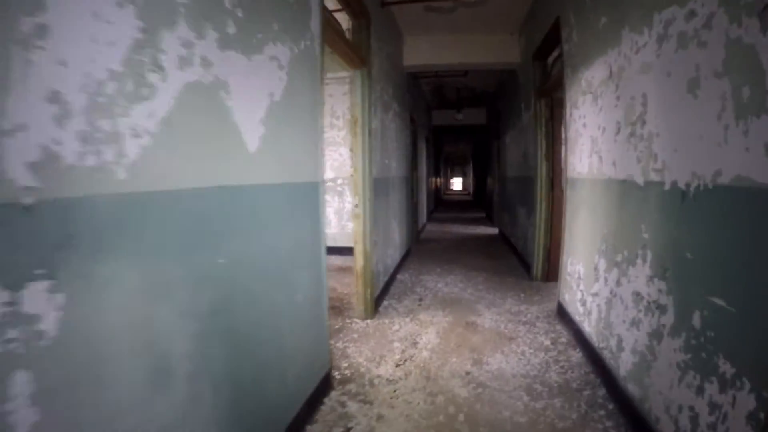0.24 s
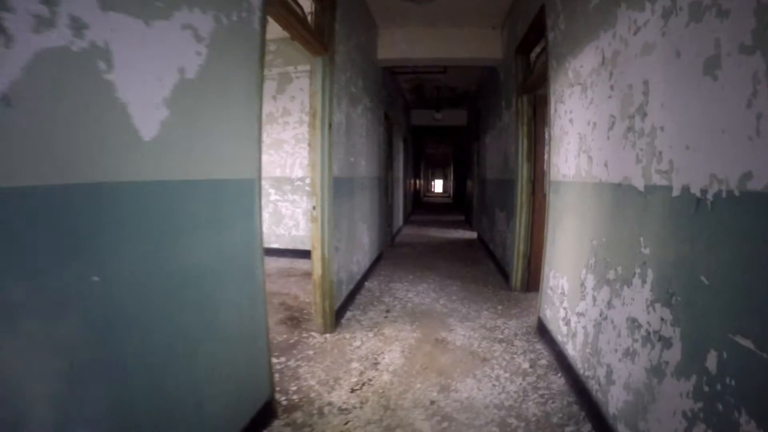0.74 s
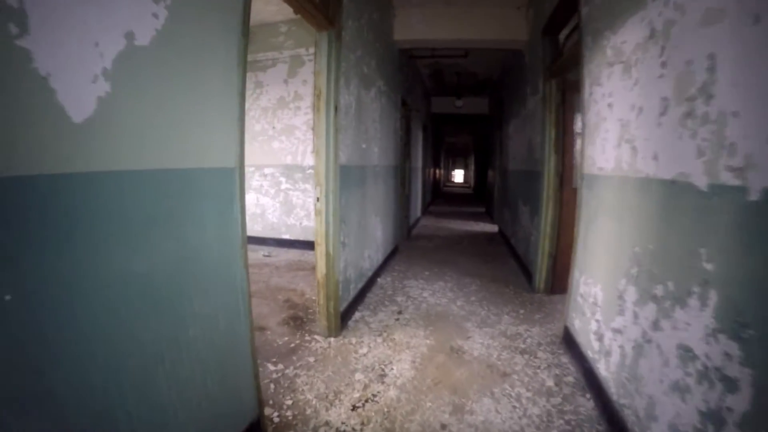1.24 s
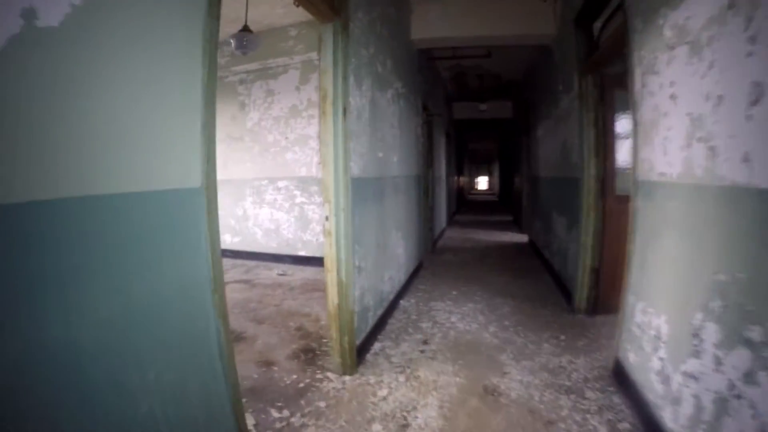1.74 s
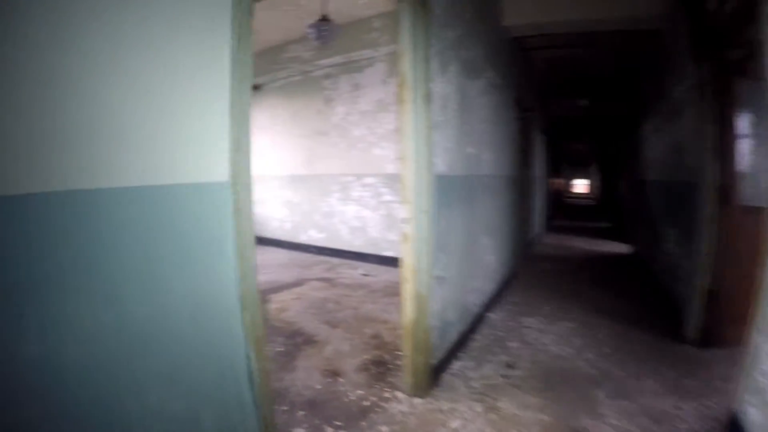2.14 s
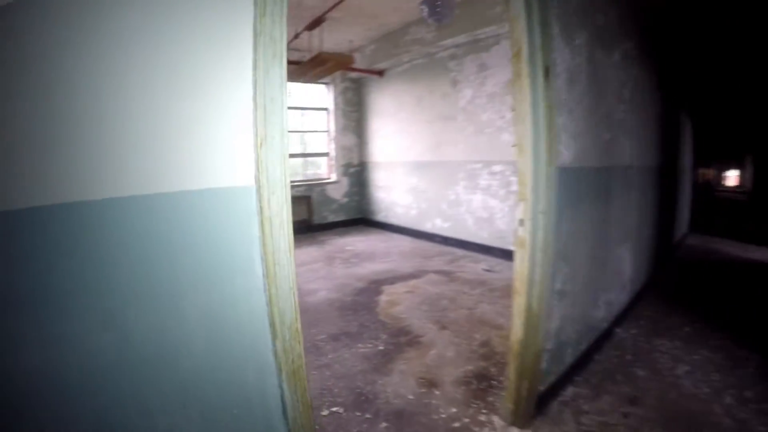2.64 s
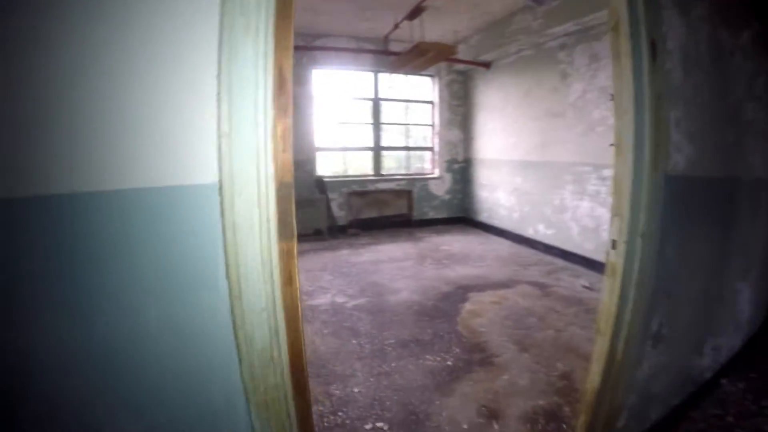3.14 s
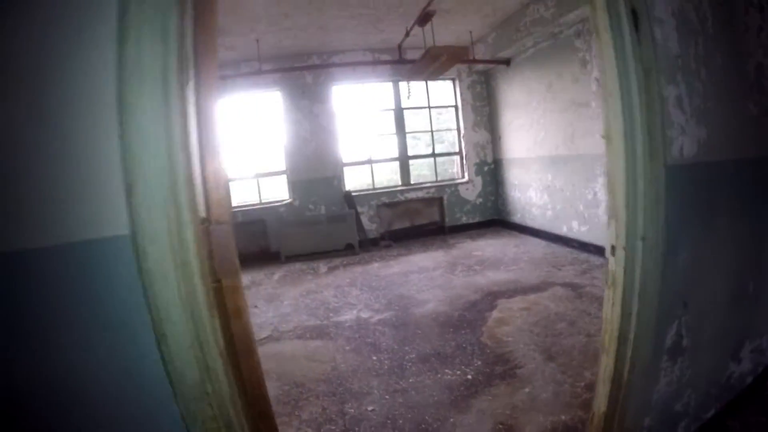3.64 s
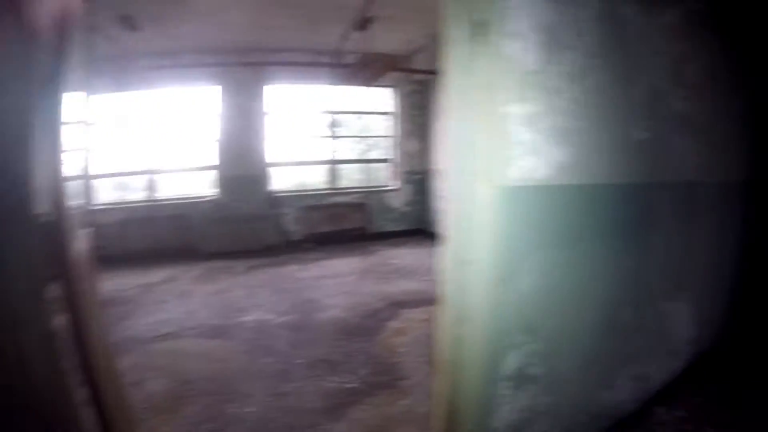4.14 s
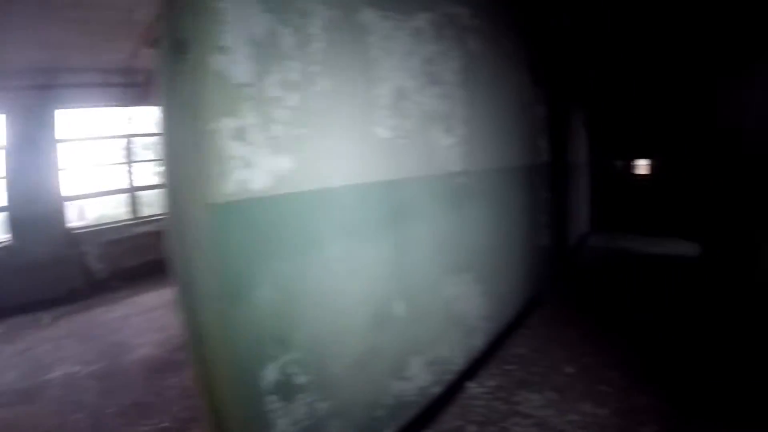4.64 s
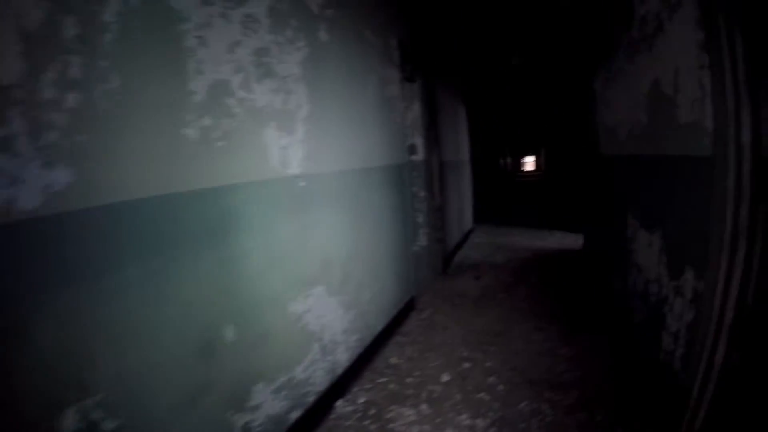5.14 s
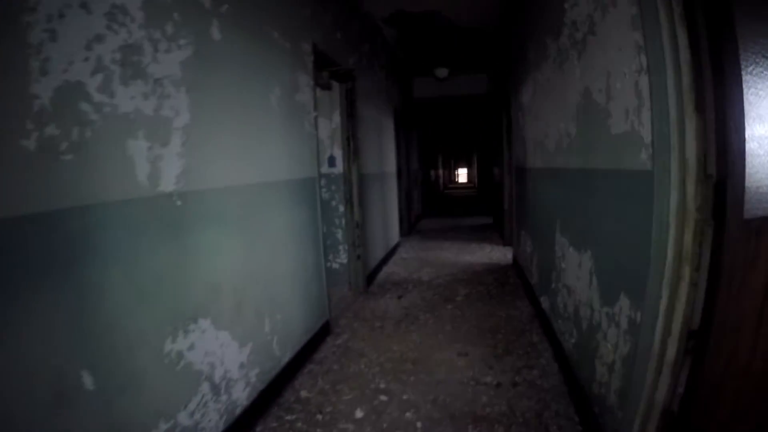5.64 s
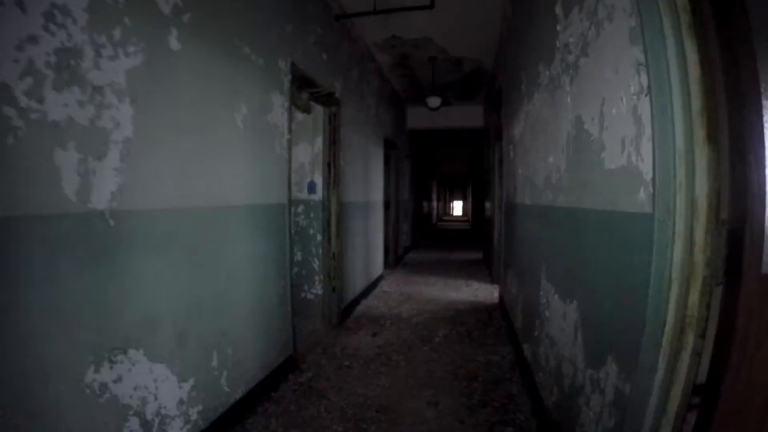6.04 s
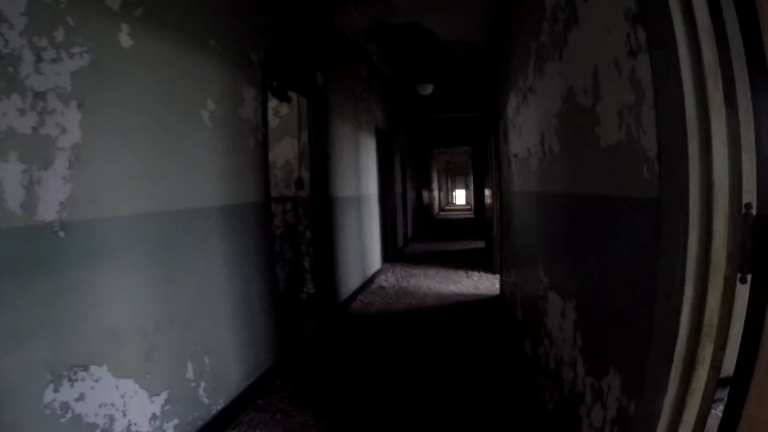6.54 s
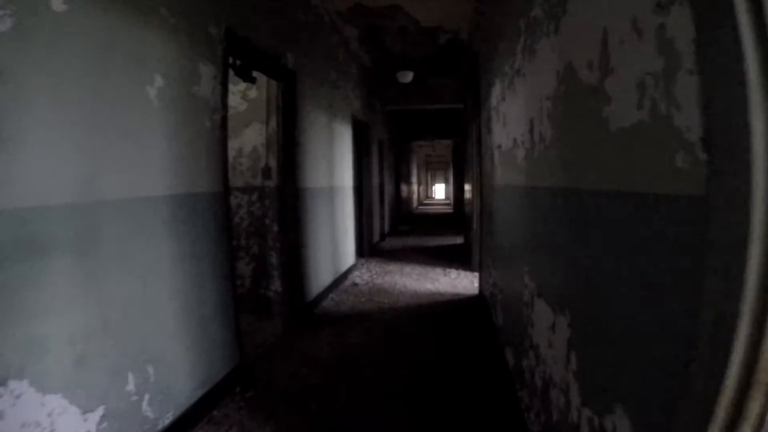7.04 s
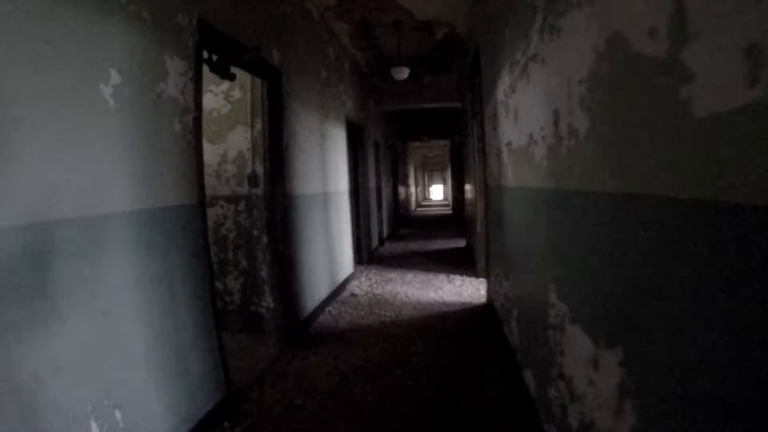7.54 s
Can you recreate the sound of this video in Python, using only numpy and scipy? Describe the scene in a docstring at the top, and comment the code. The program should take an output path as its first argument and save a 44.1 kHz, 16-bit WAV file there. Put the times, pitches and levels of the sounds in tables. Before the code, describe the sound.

Someone walks carefully over gritty, cracking debris in an empty hallway, with light scuffs, faint rumble and one low knock on the handheld camera.

```python
"""Slow footsteps crush paint flakes and plaster crumbs along a bare corridor, camera in hand.
Each crack is an impulse train, a first break and smaller ones, exciting resonances of sole, chip and flake.
Shards ring as decaying sines; scuffs and brushes are random grains; two heel blows make the floor boom.
One knock on the camera is a sum of damped modes; rumble, hiss and a faint whine are shaped noise.
The walls return cracks, grit and shards as discrete echoes and a diffuse tail."""
import sys
import numpy as np
from scipy import signal
from scipy.fft import rfft, irfft, next_fast_len
from scipy.io import wavfile
from scipy.ndimage import uniform_filter1d

SR = 44100
rng = np.random.default_rng(int(sys.argv[2]) if len(sys.argv) > 2 else 0)


def to_wav(sig):
    """Store sig (one row per channel, or 1-D mono) as 16-bit WAV at the path in sys.argv[1].

    Samples outside -1..1 are clipped; the rate is SR.
    """
    pcm = np.clip(np.atleast_2d(sig), -1, 1) * 32767
    pcm = np.round(pcm).astype(np.int16)
    wavfile.write(sys.argv[1], SR, pcm.T)  # frames by channels


N = 343980

# resonances of the shoe on the floor slab: (centre [Hz], width of each pass [Hz], relative level [dB])
SOLE = [(126, 120, -16.5), (291.4, 218, -7), (336, 370, 2), (488, 295, 4.5)]
# resonances of the finest splinters: (centre [Hz], nominal width of each pass [Hz], relative level [dB])
SPLINTER = [(8930, 7400, 8), (11340, 610, 12.5), (14500, 27000, 13.5)]
SPAN = 2048  # samples that hold one crack or shard


def from_db(db):
    """Amplitude ratio: 20 dB is a factor of ten."""
    return 10 ** (np.asarray(db) / 20)


def unit_rms(x):
    """Normalisation to a root-mean-square value of 1."""
    return x / np.sqrt(np.mean(x ** 2))


def resonance(x, hz, width):
    """Two-pole resonance, gain 1 at the centre."""
    width, hz = min(width, 0.4 * SR), min(hz, 0.45 * SR)
    g = 1 / (1 + np.tan(np.pi * width / SR))
    poles = [1, -2 * g * np.cos(2 * np.pi * hz / SR), 2 * g - 1]
    return signal.lfilter([1 - g, 0, g - 1], poles, x)


def double_resonance(x, hz, width):
    """Two equal resonances in cascade: the skirts fall twice as steeply."""
    return resonance(resonance(x, hz, width), hz, width)


def modal_body(x, modes):
    """Modal superposition: parallel resonances of alternating sign."""
    out = 0
    for k, (hz, width, db) in enumerate(modes):
        out = out + (-1) ** k * from_db(db) * double_resonance(x, hz, width)
    return out


def shaped_noise(spectrum):
    """Spectral shaping: white noise weighted through (Hz, dB) points, rms 1."""
    size = next_fast_len(N)
    hz, db = np.transpose(spectrum)
    bin_hz = np.fft.rfftfreq(size, 1 / SR)
    gain = from_db(np.interp(np.log(bin_hz + 1), np.log(hz), db, left=-90, right=-90))
    white = rng.standard_normal(size)
    return unit_rms(irfft(gain * rfft(white), size)[:N])


def slow_wander(rate):
    """Low-pass random modulation: levels held for 1 / rate s, smoothed twice; rms 1."""
    hold = int(SR / rate)
    held = np.repeat(rng.standard_normal(N // hold + 1), hold)
    smooth = uniform_filter1d(uniform_filter1d(held, hold), hold)
    return unit_rms(smooth[:N])


def level_curve(table):
    """Linear interpolation of a level in dB between (time, level) points."""
    s, db = np.transpose(table)
    return np.interp(np.arange(N) / SR, s, db)


def time_since(s):
    """Seconds elapsed since an onset, zero before it so that a sine stays silent."""
    return np.maximum(np.arange(N) / SR - s, 0)


def grains(rate, spread_db):
    """Modulated random impulses: mostly small, a few large, in flurries about a median rate per second."""
    hit = rng.random(N) < rate / SR * from_db(5 * slow_wander(25))
    size_db = spread_db * np.minimum(rng.exponential(size=N), 4)
    sign = np.sign(rng.standard_normal(N))
    return hit * sign * from_db(size_db)


def background():
    """Stationary and modulated noise: wavering rumble, hiss and a narrow resonant whine."""
    # slow rise and fall of the rumble, about which it wavers: (time [s], level [dB])
    rumble_levels = [(0, -44.5), (1.02, -50.5), (1.74, -49), (1.97, -39.5), (2.5, -48), (2.65, -42),
                     (3.3, -46.5), (5.8, -47.5), (6.3, -46), (7.45, -44.5), (7.8, -46.5)]
    # spectrum of the rumble: (frequency [Hz], relative density [dB])
    rumble_spectrum = [(15, -25), (25, 11), (40, 6.5), (57, 2.5), (75, -11), (110, -16)]
    # spectrum of the hiss: (frequency [Hz], relative density [dB])
    hiss_spectrum = [(53, -13), (90, 5.5), (217, -1.5), (450, -0.5), (677, -15.5), (975, -11.5),
                     (1530, -20), (3170, -18), (3610, -17.5), (4770, -21), (8520, -26.5), (13900, -30.5),
                     (15200, -30)]
    whine_hz, whine_width_hz, whine_db = 4840, 48, -82
    hiss_db = -57  # mean level

    whine = from_db(whine_db) * unit_rms(resonance(rng.standard_normal(N), whine_hz, whine_width_hz))
    rumble_db = level_curve(rumble_levels) + 2.7 * slow_wander(8.5)
    rumble = from_db(rumble_db) * shaped_noise(rumble_spectrum)
    hiss = from_db(hiss_db + 0.5 * slow_wander(4.4)) * shaped_noise(hiss_spectrum)
    return rumble + hiss + whine


def corridor(x):
    """Room response by convolution: wall echoes and a diffuse tail whose highest bands decay soonest."""
    # nearest walls: (delay [ms], level before the treble is dulled [dB])
    wall_echoes = [(12.2, -2), (14.5, -8.5), (22, -8), (31, -6)]
    # diffuse late tail by band: (centre [Hz], decay time to -60 dB [s], level extrapolated to its start [dB])
    tail_bands = [(110, 1, -38.5), (263, 0.79, -41.5), (470, 0.58, -45.5), (1027, 0.74, -40.5),
                  (2090, 1, -40), (4250, 0.7, -39.5), (6900, 0.48, -34), (11600, 0.2, -36)]
    build_up_s = 0.00097
    early_t60_s, early_db = 0.087, 0.85  # first crowd of reflections; level over the tail
    echo_top_hz = 6500  # low-pass corner that dulls the discrete wall echoes

    t = np.arange(int(1.2 * SR)) / SR
    build_up = 1 - np.exp(-(t / build_up_s) ** 2)
    swell = build_up * (1 + from_db(early_db - 60 * t / early_t60_s))
    response = np.zeros(len(t))
    for hz, t60, db in tail_bands:
        band = unit_rms(double_resonance(rng.standard_normal(len(t)), hz, hz))
        response += from_db(db - 60 * t / t60) * swell * band
    walls = np.zeros(len(t))
    for ms, db in wall_echoes:
        walls[int(ms * SR / 1000)] = from_db(db)
    response += signal.lfilter(*signal.butter(2, echo_top_hz, fs=SR), walls)
    return signal.fftconvolve(x, response)[:N]


def knock():
    """Damped oscillation: a dull thump reaches the microphone through the camera body."""
    onset_s, hz, t60_s, start_db = 6.097, 57, 0.2, -12.5
    t = time_since(onset_s)
    return -from_db(start_db - 60 * t / t60_s) * np.sin(2 * np.pi * hz * t)


def rap():
    """Modal decay: a rattling tap on the shell just before the thump, each mode dying on its own."""
    # modes of the camera shell: (frequency [Hz], relative level [dB], decay time to -60 dB [s])
    shell_modes = [(128, -16, 0.17), (390, -11, .04), (514, 2.5, 0.064), (754, 0.5, 0.036),
                   (1055, -7.5, 0.049), (1700, -8.5, 0.036), (2046, -17, 0.089), (2470, -3, 0.034),
                   (3060, 0.5, 0.014), (3400, -2, 0.018), (4070, -4, 0.013)]
    # the rap and its rattle: (delay [ms], relative level [dB])
    taps = [(0, 0), (1.4, -2.5), (4.5, -8), (9.5, -14)]
    onset_s, rap_db = 6.0905, -20.5

    out = np.zeros(N)
    for ms, tap_db in taps:
        t = time_since(onset_s + ms / 1000)
        signs = rng.choice([-1, 1], size=len(shell_modes))
        for sign, (hz, db, t60) in zip(signs, shell_modes):
            decay = from_db(rap_db + tap_db + db - 60 * t / t60)
            out += sign * decay * np.sin(2 * np.pi * hz * t)
    return out


def booms():
    """Damped slab mode: a heavy heel excites one low, decaying tone."""
    # heel blows: (time [s], starting level [dB])
    heel_blows = [(3.312, -36.5), (3.772, -35)]
    hz, t60_s = 121.3, 0.17
    out = np.zeros(N)
    for s, db in heel_blows:
        t = time_since(s)
        out += from_db(db - 60 * t / t60_s) * np.sin(2 * np.pi * hz * t)
    return out


def scuff():
    """Granular friction: fine grit ticks in the treble, coarse crumbs roll against sole and slab."""
    # drag of the shoes, as the level of the fine grit: (time [s], level [dB])
    drag_levels = [(0, -73), (.35, -65), (1.2, -75), (1.45, -65), (2.2, -63), (2.55, -67), (2.8, -64.5),
                   (3.9, -59.5), (4.5, -72), (5.25, -63), (5.6, -78.5), (5.9, -57.5), (6.3, -64.5),
                   (6.5, -94), (6.9, -75), (7.1, -60.5), (7.8, -78)]
    crumbs_db = 6.5  # coarse crumbs over the fine grit

    fine_grains = grains(600, 3.5)
    coarse_grains = grains(250, 4.1)
    fine = double_resonance(fine_grains, 2630, 4600)
    fine = fine + from_db(-29) * double_resonance(fine_grains, 5680, 2140)
    coarse = modal_body(coarse_grains, SOLE)
    coarse = coarse + from_db(-12) * double_resonance(coarse_grains, 830, 1500)
    grit = unit_rms(fine) + from_db(crumbs_db) * unit_rms(coarse)
    return from_db(level_curve(drag_levels)) * grit


def swishes():
    """Enveloped dense grains: resonant bursts swell and fade as the sole brushes past loose flakes."""
    # brushes, levels ahead of the swell:
    # (time [s], length [ms], pitch [Hz], flake level [dB], splinter level [dB])
    brushes = [(0.321, 64, 860, -56, -60), (.755, 70, 4600, -59, -69), (1.945, 19, 5500, -52, -37.5),
               (3.263, 13, 4050, -51, -64), (3.293, 6.3, 4500, -54, -75), (3.749, 13, 3560, -41, -49),
               (5.02, 49, 4830, -84, -82), (5.162, 19, 2250, -52, -75), (5.2, 27, 1270, -59, -82),
               (5.37, 29, 4100, -59.5, -73), (5.492, 34, 4900, -55.5, -55), (5.835, 35, 4140, -48, -53),
               (6.025, 34, 2700, -46.5, -63), (6.93, 110, 517, -57.5, -76)]
    out, dense = np.zeros(N), grains(6000, 2.5)
    for s, ms, hz, flake_db, splinter_db in brushes:
        start, size = int(s * SR), int(ms * SR / 1000)
        part = dense[start:start + size]
        swell = np.sin(np.pi * np.linspace(0, 1, size) ** 0.8)
        flakes = from_db(flake_db) * unit_rms(double_resonance(part, hz, 0.85 * hz))
        splinters = from_db(splinter_db) * unit_rms(modal_body(part, SPLINTER))
        out[start:start + size] += swell * (flakes + splinters)
    return out


def shards():
    """Constant damping per cycle: each breaking shard is one sine, and higher ones fade sooner."""
    # brittle shards: (time [s], pitch [Hz], starting level [dB])
    shard_breaks = [(0.1227, 4240, -33.5), (0.329, 970, -36), (0.537, 5230, -39.5), (1.953, 11300, -16.5),
                    (1.949, 13200, -40), (2.096, 1060, -36), (2.143, 1070, -28.5), (2.6, 5200, -30),
                    (3.307, 5240, -16), (3.308, 2460, -35), (3.522, 3140, -27), (3.648, 3240, -33),
                    (3.664, 4800, -36), (3.688, 3140, -23.5), (3.762, 5100, -29), (4.781, 2670, -28),
                    (5.169, 1490, -36.5), (5.171, 3260, -37), (5.529, 960, -44), (7.168, 3260, -28),
                    (7.474, 9650, -23), (7.487, 9600, -27), (7.683, 4570, -29)]
    fade_cycles = 20  # cycles to fall by 60 dB
    out, t = np.zeros(N + SPAN), np.arange(SPAN) / SR
    for s, hz, db in shard_breaks:
        start = int(s * SR)
        decay = from_db(db - 60 * t * hz / fade_cycles)
        out[start:start + SPAN] += decay * np.sin(2 * np.pi * hz * t)
    return out[:N]


def crack(snap_db, thud_db, chip_db, splinter_db, chip_hz, chance):
    """Impulse-excited resonances: a first break, then random smaller ones; rows (all breaks, first alone)."""
    crush_ms = 2.5  # mean delay of the smaller breaks
    flake_centre_hz, flake_scatter = 3120, 0.1  # scatter is a share of the pitch
    thin_hz, thin_width_hz = 5250, 3270  # thin paint flakes
    thin_share, thin_offset_db = 0.57, -2  # level between snap (share 0) and splinter (share 1), plus offset

    breaks = np.zeros((2, SPAN))
    delay = crush_ms * SR / 1000 * -np.log(chance[0])
    delay = np.minimum(delay, SPAN // 2).astype(int)
    np.add.at(breaks[0], delay, 0.29 * (2 * chance[1] - 1))
    breaks[:, 0] = 1

    flake_hz = flake_centre_hz * (1 + flake_scatter * (2 * chance[2, 0] - 1))
    flake = double_resonance(breaks, flake_hz, 0.83 * flake_hz)
    chip = double_resonance(breaks, chip_hz, 0.72 * chip_hz)
    chip = chip - from_db(-15.5) * double_resonance(breaks, 1.57 * chip_hz, 2.05 * chip_hz)
    # the sole feels only the first blow
    thud = modal_body(breaks[[1, 1]], SOLE)
    # splinters get a weaker first break, so their attack is softer
    spray = breaks.copy()
    spray[0, 0] = 0.43
    splinters = modal_body(spray, SPLINTER)
    thin = double_resonance(breaks, thin_hz, thin_width_hz)
    thin_db = snap_db + thin_share * (splinter_db - snap_db) + thin_offset_db

    parts = [(flake, snap_db), (thud, thud_db), (chip, chip_db), (splinters, splinter_db), (thin, thin_db)]
    return sum(from_db(db) * x / np.abs(x[0]).max() for x, db in parts)


def footsteps():
    """Direct sound plus floor reflection of every crack, and the first breaks that wake the walls."""
    # cracks underfoot, peak of each part ahead of the reflections:
    # (time [s], flake snap [dB], sole thud [dB], plaster chip [dB], splinters [dB], chip pitch [Hz])
    cracks = [(0.1236, -42, -67, -77, -51, 880), (0.3307, -42, -41, -60, -45, 970),
              (0.597, -39, -53, -43.5, -48, 1130), (1.258, -22.5, -22.5, -21, -38.5, 860),
              (1.299, -44, -57, -37, -65, 1110), (1.343, -39.5, -57, -54, -72, 719),
              (1.412, -34, -41, -40, -67, 1070), (1.4318, -33.5, -39, -35.5, -70, 1010),
              (1.5861, -28.5, -19.5, -26, -31.5, 690), (1.6975, -34.5, -34, -32, -80, 980),
              (1.7229, -40, -44, -40, -72, 1100), (1.7908, -42, -38, -44, -53, 1100),
              (1.922, -32, -25.5, -35.5, -34, 760), (2.0965, -27, -30.5, -25.5, -74, 960),
              (2.1056, -32, -28, -29.5, -52, 700), (2.142, -25.5, -21, -26, -28, 965),
              (2.2354, -41, -33, -39, -66, 991), (2.3955, -43, -38, -42.5, -68, 920),
              (2.602, -31, -41, -42.5, -47, 1130), (2.8857, -37.5, -46, -44, -42, 1220),
              (2.9198, -25, -22, -24, -76, 930), (2.9766, -36, -52, -33.5, -66, 1010),
              (3.0311, -34.5, -44, -43, -65, 624), (3.1709, -31, -32.5, -32, -32.5, 614),
              (3.3062, -18, -32.5, -32.5, -26, 1400), (3.5225, -24, -38.5, -35.5, -87, 1160),
              (3.649, -25.5, -82, -48, -31, 1660), (3.661, -51, -68, -52, -36, 1650),
              (3.686, -29, -42, -51, -37, 690), (3.712, -34, -35.5, -38.5, -55, 695),
              (3.761, -12.5, -17, -20.5, -18.5, 574), (3.7721, -20.5, -39, -61, -62, 756),
              (3.9779, -35, -46, -41, -47, 1010), (4.01, -36, -41.5, -62, -41.5, 708),
              (4.4922, -61, -45, -47, -77, 1010), (4.5882, -23.5, -37.5, -28, -36, 1080),
              (4.678, -40.5, -44, -38, -61, 1130), (4.7801, -24, -32, -20, -35, 1400),
              (5.133, -45, -45.5, -42.5, -55, 1050), (5.235, -53, -45.5, -48, -72, 1000),
              (5.5273, -59, -48, -50.5, -73, 970), (5.9002, -31.5, -36, -37, -55, 765),
              (5.9538, -38.5, -58, -64, -54, 651), (6.0014, -30, -33, -29, -81, 840),
              (6.1785, -36.5, -55, -63, -76, 596), (6.2149, -36, -38, -37.5, -40.5, 930),
              (6.241, -35.5, -69, -62, -40.5, 907), (6.674, -52.5, -54, -49, -64, 790),
              (6.9276, -36.5, -36.5, -44, -49, 700), (7.0304, -37, -47, -43, -47, 1030),
              (7.0438, -28.5, -65, -48, -41.5, 674), (7.068, -38, -50, -44, -67, 1010),
              (7.1678, -26.5, -44, -28.5, -39, 940), (7.2398, -26.5, -53, -40, -32.5, 1000),
              (7.3148, -29, -49, -35.5, -35.5, 915), (7.4725, -34.5, -47, -45, -25.5, 791),
              (7.6124, -28, -39, -36, -24, 774), (7.6819, -41, -72, -74, -41, 743)]
    floor_delay_ms = 2.1  # the floor reflection is as strong as the direct sound
    room_db = -4  # share of a first break that wakes the walls

    near, far = np.zeros(N + SPAN), np.zeros(N + SPAN)
    chances = rng.uniform(1e-6, 1, (len(cracks), 3, 16))
    for (s, *colour), chance in zip(cracks, chances):
        whole, first = crack(*colour, chance)
        start = int(s * SR)
        near[start:start + SPAN] += whole
        far[start:start + SPAN] += from_db(room_db) * first
    near = near + np.roll(near, int(floor_delay_ms * SR / 1000))
    return near[:N], far[:N]


def scene():
    """Linear superposition of direct sounds, corridor response, camera knock and background."""
    near, far = footsteps()
    grit = scuff() + swishes()
    ringing = shards()
    room = corridor(far + from_db(-10.5) * grit + from_db(-13) * ringing)
    camera = knock() + rap()
    return (near + grit + ringing + room + booms() + camera + background())[None]


def record(dry):
    """Linear filtering: port resonances colour the sound, then the treble steps down and is cut."""
    # microphone port: (centre [Hz], width [Hz], nominal gain at the centre [dB])
    port_resonances = [(400, 440, -2), (3270, 650, 3.5), (3536, 650, -7), (5200, 1700, 2.5),
                       (7060, 5800, -3.5), (7600, 3900, 0.5)]
    edge_hz, edge_db = 15350, -25  # step down above the edge
    top_hz = 16400  # final cut

    x = dry
    for hz, width, db in port_resonances:
        x = x + (from_db(db) - 1) * resonance(x, hz, width)
    low = signal.sosfiltfilt(signal.ellip(6, 0.1, 40, edge_hz, fs=SR, output="sos"), x)
    x = low + from_db(edge_db) * (x - low)
    return signal.sosfilt(signal.ellip(10, 0.2, 80, top_hz, fs=SR, output="sos"), x)


dry = scene()
out = record(dry)
to_wav(out)
```